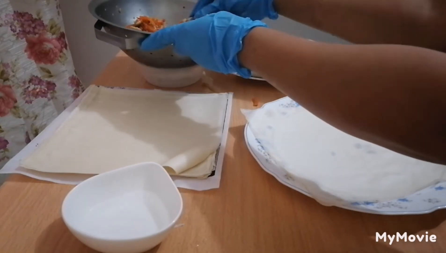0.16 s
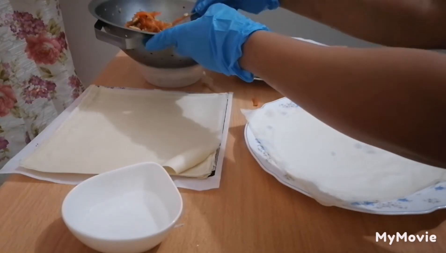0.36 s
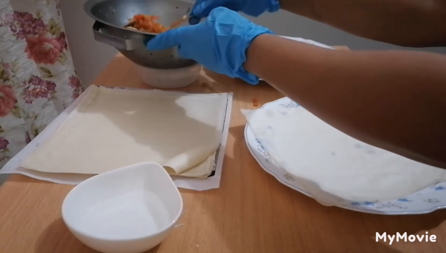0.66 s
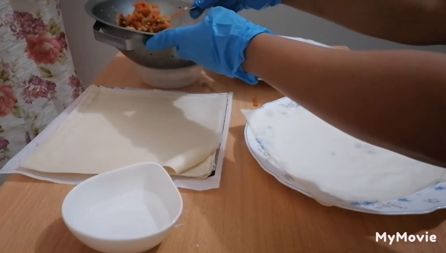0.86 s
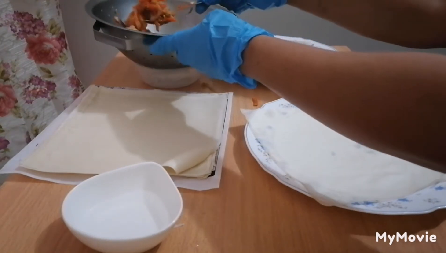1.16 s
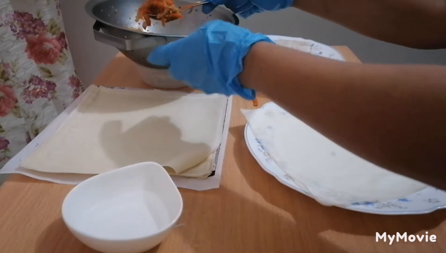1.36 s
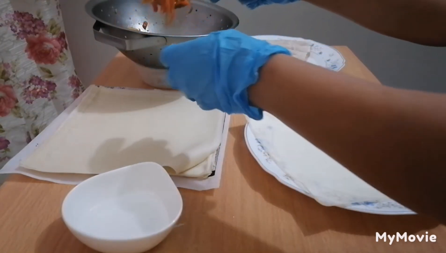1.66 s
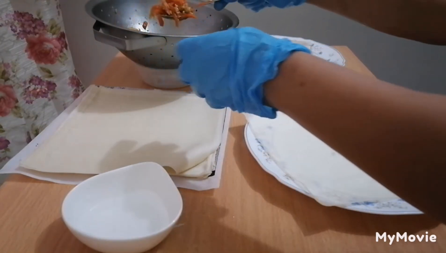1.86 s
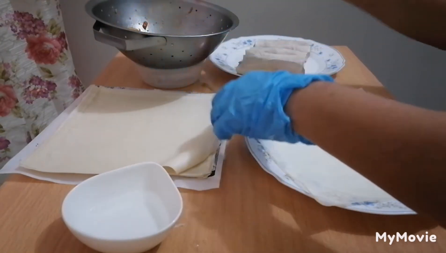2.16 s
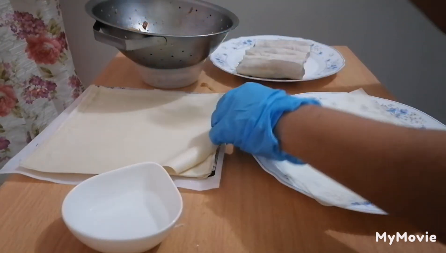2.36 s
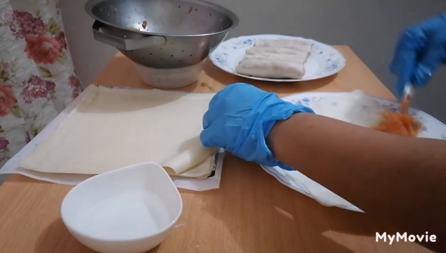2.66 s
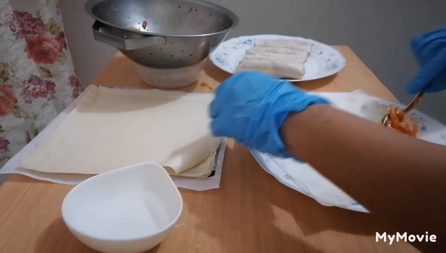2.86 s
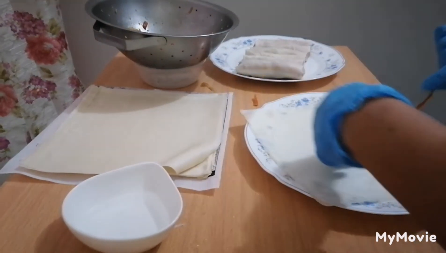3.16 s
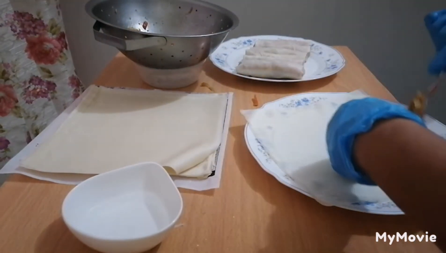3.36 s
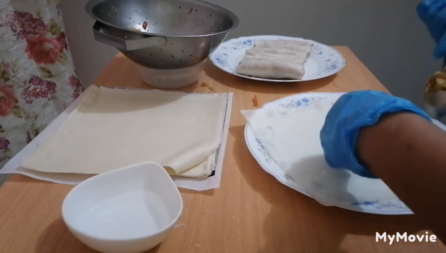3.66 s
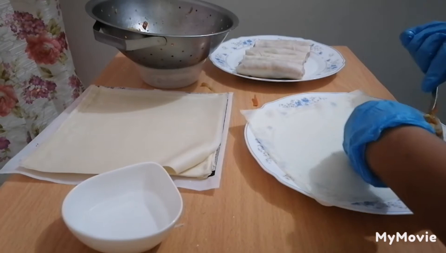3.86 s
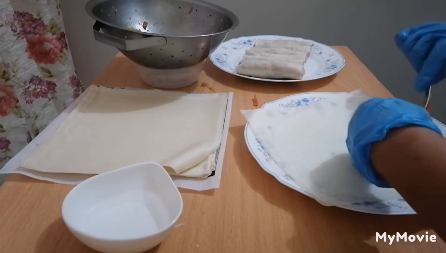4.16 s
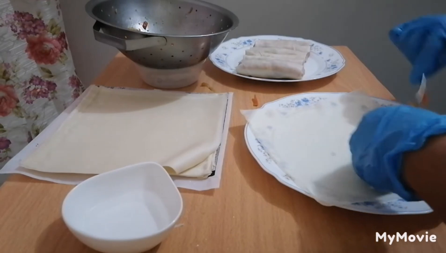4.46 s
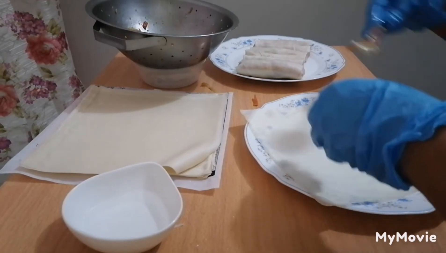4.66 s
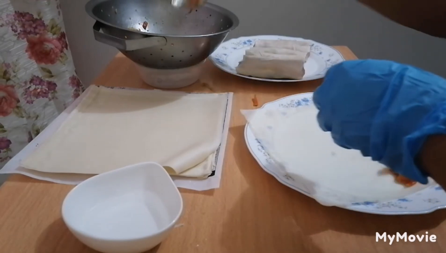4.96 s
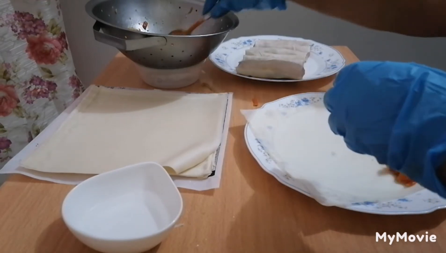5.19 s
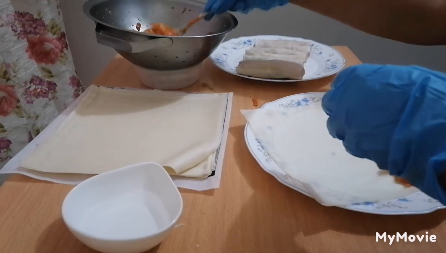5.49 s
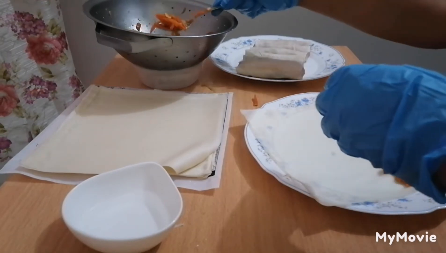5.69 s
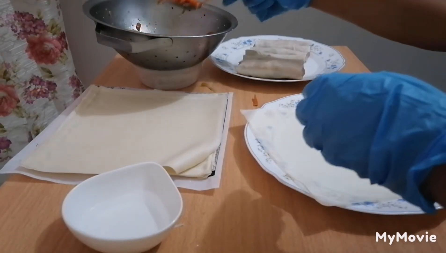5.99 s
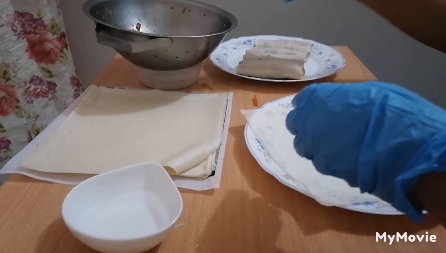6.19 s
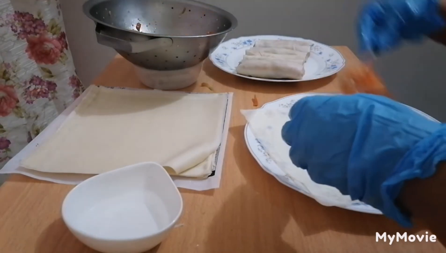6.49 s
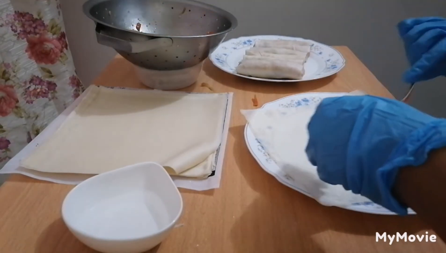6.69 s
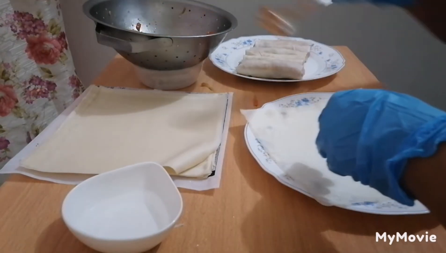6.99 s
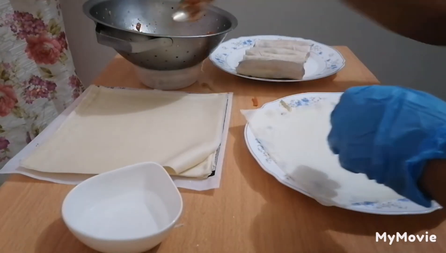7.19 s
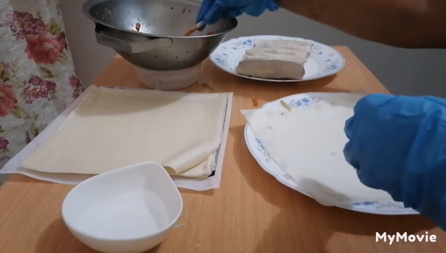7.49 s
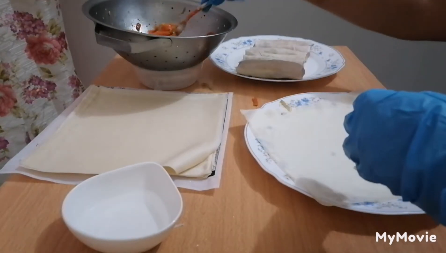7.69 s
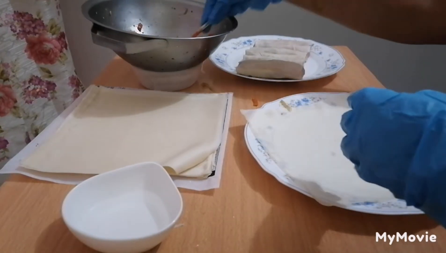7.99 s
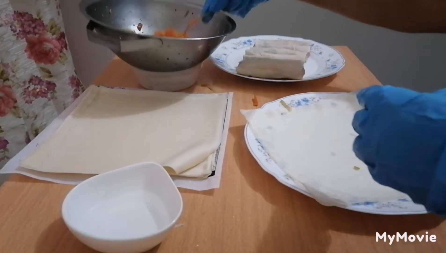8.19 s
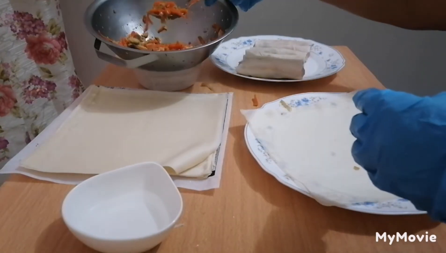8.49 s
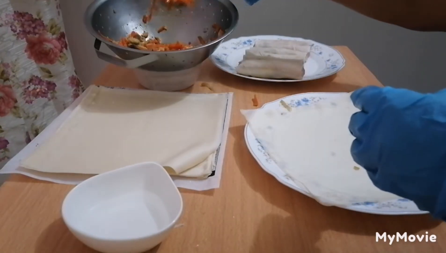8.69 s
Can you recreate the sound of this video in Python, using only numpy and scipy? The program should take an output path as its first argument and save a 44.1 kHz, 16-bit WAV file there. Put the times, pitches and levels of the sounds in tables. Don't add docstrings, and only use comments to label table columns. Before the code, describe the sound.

Close, slightly hissy stereo pickup at a kitchen table. Soft dry crinkling of gloves and pastry comes and goes over a constant low hum. A sudden metallic clink and gritty scrape rings the steel bowl, then near quiet with light brushes, a woody knock and a crisp high tick. Finally spoon scraping returns, with rapid hollow knocks as the bowl judders on the wood, dying back to hum.

```python
import sys
import numpy as np
from scipy import signal
from scipy.fft import rfft, irfft
from scipy.io import wavfile
from scipy.ndimage import uniform_filter1d

SR = 44100
rng = np.random.default_rng(int(sys.argv[2]) if len(sys.argv) > 2 else 0)


def wav_out(sig):
    wavfile.write(sys.argv[1], SR, np.round(np.clip(np.atleast_2d(sig).T, -1, 1) * 32767).astype(np.int16))


def makeup_ratio(level_db):
    decades = np.asarray(level_db, float) / 20
    return 10 ** decades


N = 389844

# mains_multiple, level_db, left_minus_right_db, left_lead_rad
HUM_LINES = [(1, -52, -3.5, -0.36), (2, -66, -3.5, -0.36), (3, -61, -4.5, 0.07), (4, -90.5, 0, -.3),
             (5, -85, -4, -1.5), (8, -89, 4, 8), (9, -84, 8, 1.7)]
# shaft_multiple, level_db, left_minus_right_db
ROTOR_LINES = [(0.915, -75, 0), (4.63, -88, 6), (6.94, -74, -2), (11.04, -69.5, 1), (13.04, -82, -5.5),
               (13.88, -69, -4), (14.92, -77, 0), (17.12, -73.5, -5), (23.3, -77, 5), (28.5, -108, 11),
               (34.6, -82.5, 4.5), (45.7, -79, -2.5)]
# centre_hz, width_hz, level_db, left_minus_right_db
ROOM_BOOMS = [(53.7, 3.1, -70.5, -5), (184.4, 8.4, -69.5, -3), (369.8, 8.2, -74.5, 0),
              (431.4, 3.3, -73.5, 0), (560, 2.7, -82, -11.5), (726.5, 29, -75.5, -6)]
# freq_hz, density_db_per_hz
AIR_SPECTRUM = [(15, -85), (80, -76.5), (140, -90.5), (240, -81.5), (350, -91), (600, -98), (1000, -102),
                (1500, -110), (2500, -113), (3400, -115), (4000, -124), (5200, -121), (8000, -132),
                (16000, -140)]

# peak_s, rise_s, fall_s, level_db, dullness_db
PASTRY_SLIDES = [(.46, 0.086, 0.038, -66, 1), (.65, 0.17, 0.1, -74.5, 7.5), (.8, 0.12, 0.11, -82.5, 10.5),
                 (1.15, 0.22, 0.082, -76.5, 3.5), (2.05, 0.11, 0.086, -66.5, 0),
                 (2.3, .06, 0.28, -75.5, 6.5), (2.445, 0.12, 0.22, -63.5, 2),
                 (2.503, 0.11, 0.042, -53.5, -6), (2.57, 0.06, 0.025, -67, 7),
                 (2.86, 0.079, 0.077, -64.5, -1), (2.96, 0.04, 0.29, -61.5, -5.5),
                 (3.04, 0.078, 0.11, -60, -8), (3.13, 0.094, 0.039, -66, 0),
                 (3.335, 0.059, 0.083, -65, 4.5), (3.445, 0.023, 0.13, -64, 4.5),
                 (3.49, 0.023, 0.12, -57, 1.5), (3.78, 0.088, 0.08, -67, -0.5),
                 (3.862, 0.033, 0.076, -51, 0), (3.93, .06, 0.066, -66.5, 4), (4.16, 0.073, 0.03, -70.5, 5),
                 (4.23, .1, 0.12, -72.5, -4), (4.65, 0.33, 0.43, -74, -4)]
# peak_s, rise_s, fall_s, level_db, dullness_db
GLOVE_BRUSHES = [(1.48, 0.27, .1, -70.5, 5), (1.82, 0.19, 0.14, -71, 1), (3.68, .03, .04, -73, -16),
                 (4.46, 0.074, 0.14, -60, 2), (4.98, 0.058, 0.062, -74, 0), (5.1, .2, 0.25, -73.5, -8),
                 (6.33, 0.11, 0.055, -75, -2), (6.49, 0.1, 0.055, -68, 4.5), (6.606, .02, 0.12, -68, -6),
                 (6.78, 0.18, .07, -72, -10), (7.44, .04, .15, -78, 11.5), (7.51, 0.076, 0.24, -69, -3),
                 (7.56, 0.16, 0.079, -81, 17), (7.746, 0.017, 0.086, -71, -14), (7.93, 0.17, .05, -79, -5),
                 (8.55, .03, 0.11, -74, -3)]
# peak_s, rise_s, fall_s, level_db, dullness_db
SKIN_CRINKLES = [
    (.64, 0.15, 0.053, -63, 2),
    (.78, 0.11, 0.1, -72.5, 0),
    (1.14, .15, 0.11, -80, 0),
    (2.065, .09, 0.059, -67.5, 0),
    (7.038, .03, 0.027, -76, 0),
    (7.5, 0.16, .3, -78, 0),
]
# low_hz, high_hz
RUSTLE_BANDS = [(4500, 8500), (8500, 13500), (2200, 4200), (900, 2000)]
# level_db, slope_db_per_dullness_db
PASTRY_BALANCE = [(-7, 0), (-6.5, -0.2), (-6.5, 1.3), (-26, 3.5)]
GLOVE_BALANCE = [(-9, -0.3), (-12.5, -0.24), (-7.5, 0.24), (-15.5, 1.6)]
SKIN_BALANCE = [(-13, 0), (-0.5, 0), (-41, 0), (-36, 0)]
IDLE_LEVELS = [-101, -93, -91, -89]
# middle_s, length_s, centre_hz, width_hz,
# level_db
HOLLOW_DRAGS = [(0.453, 0.097, 1200, 450, -68), (0.648, 0.2, 1980, 350, -68), (0.646, 0.14, 1300, 500, -64),
                (0.707, 0.78, 764, 119, -66.5), (.9, 0.22, 1690, 250, -74), (1.44, 0.057, 1190, 150, -71),
                (2.485, 0.34, 825, 250, -66.5), (2.57, 0.22, 1660, 200, -65.5),
                (3.067, 0.27, 1640, 202, -71), (3.861, 0.054, 108, 40, -38),
                (4.447, 0.064, 1235, 150, -61.5), (5.643, 0.078, 1480, 60, -68.5),
                (7.55, 0.094, 1870, 120, -78), (8.479, 0.02, 1200, 200, -55), (8.112, 0.057, 120, 50, -61),
                (1.47, .2, 5500, 1000, -81), (2.06, .12, 5300, 600, -76), (3.06, .2, 5700, 1400, -77),
                (3.5, .12, 5800, 1400, -74), (7.905, .12, 7300, 400, -84), (7.505, .06, 7700, 900, -76),
                (7.75, .03, 5860, 900, -73), (7.54, .15, 1200, 400, -67), (8.37, .1, 2300, 900, -62)]

# start_s, peak_db, lower_part_db, upper_part_db
TICK_EVENTS = [(2.4405, -58, -8, -10), (2.506, -43.5, 6, -4), (2.5, -52, 0, -4), (2.517, -54, 0, -6),
               (2.512, -53, 4, 3), (2.582, -48.5, -1, -6), (2.9464, -60, -8, -12), (3.035, -58, -5, -10),
               (3.052, -56, -5, -10), (3.4343, -65, 3, -10), (3.858, -50, 0, -6), (3.8464, -68, -9, -12),
               (4.033, -54, -5, -18), (4.1635, -49, -12, -7), (4.646, -54, -4, 0), (4.6974, -64, -5, 5),
               (5.188, -49, -14, -10), (5.264, -15, -11, -15.5), (5.2764, -23, -18, -5),
               (5.283, -30, -10, -10), (5.2994, -33, -10, -10), (5.3119, -36, -8, -10),
               (5.3415, -36, 0, -12), (5.355, -39, -8, -10), (5.373, -39, -8, -10), (5.388, -36, -5, -10),
               (5.395, -33, 2, -10), (5.411, -34, -2, -17), (5.4357, -44, -5, -14), (6.605, -56, -11, -11),
               (6.666, -43.5, -16, -22), (6.7264, -44, -5.5, -17), (6.829, -55, -12, -18),
               (7.0349, -58, -10, -7), (7.1072, -66, -10, -12), (7.121, -50, -2, -11),
               (7.2688, -24, -44, -18), (7.2805, -27, -40, -19), (7.741, -53, -8, -21),
               (7.757, -67, -25, -18), (7.7887, -58, -8, -18), (7.871, -51, -22, -20),
               (7.9544, -24.5, -14, 1.5), (7.958, -25, -6, -3), (7.9761, -20.5, -5.5, -11),
               (7.9843, -23, -6, -12), (7.991, -23, -8, -12), (8.006, -30, -8, -12), (8.0258, -31, -6, -12),
               (8.036, -36, -8, -12)]
# low_hz, high_hz
TICK_BANDS = [(5950, 9200), (2300, 5800), (9200, 17000)]
# start_s, peak_db, brightness_db
TABLE_KNOCKS = [(2.8675, -53.5, -24), (3.868, -58, -7), (5.264, -46.5, -1), (6.6668, -33.5, -5),
                (6.6699, -30, -35), (6.6715, -33, -33), (6.6748, -41, -30), (6.6805, -42, -27),
                (6.6935, -37.5, -20), (6.715, -48, -20), (6.735, -46.5, -25)]
# freq_hz, level_db, t60_s
TABLE_MODES = [(470, 9, 0.12), (366, -16, 0.07), (200, -9, 0.069), (660, -3, .045), (570, 1.5, 0.034),
               (710, 13, 0.021), (730, 3, 0.04), (864, 1.5, 0.059), (1008, 11, 0.024), (1200, 2.5, 0.045),
               (1490, -4, .03), (288, -2, 0.054), (1920, -3, 0.043), (2150, 1, .1), (3300, 14, 0.03),
               (3365, -3, .04)]
# start_s, peak_db, brightness_db
FOOT_SKIPS = [(7.977, -45, 16), (8.074, -29, -11), (8.082, -62, -5), (8.1085, -27.5, -23), (8.122, -38, -8),
              (8.13, -38, -11), (8.285, -35, -19), (8.315, -32, -11), (8.329, -43, -11),
              (8.3438, -22.5, -18), (8.3528, -31, -7), (8.3587, -44, -12), (8.3665, -31, -7),
              (8.3773, -31, -8), (8.3836, -28.5, -9), (8.3995, -27, -12), (8.403, -37, -10),
              (8.4114, -37, -14), (8.423, -44, -12), (8.46, -39, -21), (8.141, -38, -8), (8.149, -41, -10),
              (8.092, -40, -6), (8.48, -48, -18), (8.0765, -45, -11)]
# freq_hz, level_db, t60_s
FOOT_MODES = [(646, -14, 0.044), (788, -6, .035), (845, 3, 0.015), (1080, -14, 0.021), (1630, -1.5, 0.017),
              (2120, -3, 0.017)]

# start_s, rim_db, wall_db
SPOON_CLINKS = [(5.188, -49, -90.5), (5.264, -45.5, -60), (5.278, -52, -68), (5.341, -68, -55),
                (5.368, -62, -80), (5.395, -64, -61), (5.414, -82, -66), (7.956, -68, -49.5),
                (7.964, -72, -58), (7.972, -68, -51), (7.978, -61, -53), (7.989, -73, -55),
                (7.996, -74, -65)]
# freq_hz, level_db, t60_s
RIM_MODES = [(800, 9, 0.2), (880, 2.5, .1), (915, 0.5, 0.11), (985, -4, 0.14), (1060, -7, 0.085)]
WALL_MODES = [(2420, -9, .16), (2430, -15, .1), (3216, 5, 0.11), (3300, 11.5, 0.06), (3830, -18, .2),
              (5240, -28, .15), (6100, -16, 0.16)]
BOWL_MODES = [(1480, -7, 0.16), (1926, -4, 0.089), (2150, -26, 0.062), (2600, 1, 0.097), (2700, -4, 0.12),
              (3084, -3, .1), (3320, -4.5, 0.078), (2840, -5, 0.074), (3860, -5, .15), (4700, -15, 0.16),
              (5190, 0, 0.073), (6200, 4, 0.082), (6430, 0, .08), (7030, -1.5, 0.082), (8320, -5, .08)]
# peak_s, rise_s, fall_s, level_db, dullness_db
EDGE_RUNS = [(5.264, 0.0048, 0.04, -31, -1), (5.277, 0.008, 0.042, -32, -1), (5.31, 0.034, 0.11, -39, -4),
             (5.35, 0.043, 0.055, -31, -1.5), (5.375, .04, 0.045, -42, -3),
             (5.398, 0.043, 0.035, -33, -3.5), (5.45, .03, 0.078, -52, 1), (5.51, .04, 0.067, -65, 2),
             (7.954, 0.0036, 0.057, -34, -1), (7.964, 0.015, .04, -40, 0),
             (7.974, 0.014, 0.051, -27.5, 3.5), (7.99, 0.017, 0.048, -37, 0),
             (8.02, 0.027, 0.045, -39.5, 1), (8.04, 0.049, 0.2, -47.5, -5), (8.22, 0.097, .1, -84, -5),
             (8.33, 0.078, 0.1, -47.5, -8), (8.365, 0.033, .06, -46, -2), (8.4, 0.071, .03, -43, -2.5),
             (8.47, .03, 0.087, -64, 7)]
# peak_s, rise_s, fall_s, level_db, dullness_db
BOWL_PUSHES = [(5.27, 0.015, 0.036, -44, 1), (5.41, .06, 0.033, -64, -2), (5.48, 0.082, 0.069, -66.5, -12),
               (7.979, 0.021, 0.046, -63, 11), (8.077, 0.011, 0.032, -53, -12.5),
               (8.108, 0.053, 0.05, -56, -7), (8.29, 0.037, 0.091, -47.5, -5),
               (8.348, .012, 0.073, -44, -1), (8.398, 0.17, 0.039, -43, 4), (8.47, .04, 0.027, -58, -2)]
# low_hz, high_hz
SCRAPE_BANDS = [(4850, 16000), (2250, 3600), (1150, 2200), (520, 1150)]
# level_db, slope_db_per_dullness_db
EDGE_BALANCE = [(-8, -0.5), (-19.5, 1), (-34.5, -2), (-50, 4)]
WEIGHT_BALANCE = [(-43, -0.057), (-21.5, -0.88), (-7.5, -0.97), (-4, 0.33)]
# freq_hz, level_db, t60_s
PLATE_MODES = [(575, 17, 0.033), (4930, 1, .04), (6000, 4, 0.025), (6850, 2, 0.034), (8400, -2, 0.018)]
SPOON_MODES = [(7300, -2, .15), (6934, -3, .14), (7036, -4, .15), (7180, -3, .17), (7410, -2, .16),
               (7540, -4, .15), (8080, -6, .15), (8457, -6, .13), (10620, -6, .15), (11510, -9, .13)]

# freq_hz, left_db, right_db
HANDS_SHADING = [(1000, 1.5, 0.5), (2200, -2.5, -0.5), (3800, -1.5, 2.5), (4900, 0, 0.5), (5900, -3, 9),
                 (7600, -5, -2), (8300, 5, -2.5), (10100, 0, -2), (13500, -3, -2), (14800, 8, 6)]
BOWL_SHADING = [(400, 0.5, -1), (774, 4.5, -2), (1400, -1.5, 1), (2800, -0.5, -0.5), (3500, 2, 1.5),
                (4100, 3.5, 0.5), (4800, 2, 0.5), (5960, -4, 2), (8100, 6.5, -0.5), (9750, -1, 0),
                (13500, 0.5, -1), (14900, 0, 3)]
# freq_hz, gain_db
LEFT_CAVITY = [(100, -3.5), (1500, -1.5), (3000, 1.5), (4100, -7), (5200, -2), (5900, 2.5), (7200, -1.5),
               (8200, -7), (9500, 5), (10100, 10.5), (10700, 2.5), (11400, 1), (12400, -4), (16000, -17.5)]
RIGHT_CAVITY = [(100, 0), (1500, 0), (3000, 1), (4100, -2), (5200, 3), (5850, 0), (6550, 6), (7000, 11),
                (7320, 16.5), (7650, 12), (8000, 7), (9300, -4), (10700, -8), (16000, -13)]
# freq_hz, gain_db
OVERALL_TONE = [(100, -0.5), (3300, 1), (3700, -3), (4150, -2.5), (4700, 0.5), (8200, -3), (8800, -3),
                (9600, -2), (16000, -0.5)]


def noise(*shape):
    return rng.standard_normal(shape)


def convolve(x, response):
    return signal.fftconvolve(x, response, axes=-1)[..., :N]


def colour(points, size=4096):
    hz, db = np.transpose(points)
    grid_hz = np.maximum(np.arange(size // 2 + 1) * SR / size, 1)
    gain_db = np.interp(np.log(grid_hz), np.log(hz), db)
    cepstrum = irfft(np.log(makeup_ratio(gain_db)))
    cepstrum[1:size // 2] *= 2
    cepstrum[size // 2 + 1:] = 0
    return irfft(np.exp(rfft(cepstrum)))


def band(x, lo_hz, hi_hz, order=3):
    return signal.sosfilt(signal.butter(order, [lo_hz, hi_hz], "band", fs=SR, output="sos"), x)


def resonance(x, centre_hz, width_hz, order):
    return unit(band(x, centre_hz - width_hz / 2, centre_hz + width_hz / 2, order))


def unit(x):
    return x / np.std(x)


def walk(rate_hz):
    k = int(SR / rate_hz)
    return unit(uniform_filter1d(uniform_filter1d(noise(N), k), k))


def pan(x, left_minus_right_db):
    return x * makeup_ratio(np.array([[left_minus_right_db], [-left_minus_right_db]]) / 2)


def blows(seconds, db):
    x = np.zeros(N)
    x[(np.asarray(seconds) * SR).astype(int)] = makeup_ratio(db)
    return x


def soft(x, contact_s):
    push = np.hanning(int(contact_s * SR) + 3)
    return convolve(x, push / push.sum())


def ring(x, modes):
    out = np.zeros(N)
    for hz, db, t60_s in modes:
        pole = np.exp((2j * np.pi * hz - np.log(1000) / t60_s) / SR)
        out += makeup_ratio(db) * signal.lfilter([1], [1, -pole], x).imag
    return out


def grains(per_s, spread_db):
    slips = rng.random(N) < per_s / SR
    return slips * noise(N) * makeup_ratio(spread_db * rng.exponential(size=N))


def strokes(rows, balance):
    roundness = 1.05
    t = np.arange(N) / SR
    out = np.zeros((len(balance), N))
    band_db, slope = np.transpose(balance)
    for peak_s, rise_s, fall_s, level_db, dull_db in rows:
        near = slice(max(int((peak_s - 3 * rise_s) * SR), 0), int((peak_s + 3 * fall_s) * SR))
        away = np.maximum((peak_s - t[near]) / rise_s, (t[near] - peak_s) / fall_s)
        gain = makeup_ratio(level_db + band_db + slope * dull_db)
        out[:, near] += gain[:, None] * makeup_ratio(-20 * away ** roundness)
    return out


def rubbed(slips, gains, bands_hz):
    return sum(gain * unit(band(slips, *hz)) for gain, hz in zip(gains, bands_hz))


def fan_hum():
    mains_hz, shaft_hz = 100.0, 16.65
    t = np.arange(N) / SR
    sides = np.array([[.5], [-.5]])
    out = np.zeros((2, N))
    for k, db, lr_db, lead_rad in HUM_LINES:
        phase = 2 * np.pi * (k * mains_hz * t + rng.random()) + lead_rad * sides
        out += pan(np.sqrt(2) * makeup_ratio(db + 0.62 * walk(0.47)) * np.sin(phase), lr_db)
    turn = 2 * np.pi * np.cumsum(shaft_hz * (1 + 0.002148 * walk(0.95))) / SR
    for k, db, lr_db in ROTOR_LINES:
        line = np.sin(k * turn + 2 * np.pi * rng.random())
        out += pan(np.sqrt(2) * makeup_ratio(db + 0.31 * walk(1.8)) * line, lr_db)
    for hz, width_hz, db, lr_db in ROOM_BOOMS:
        feed = noise(N) + 1.2 * noise(2, N)
        out += pan(makeup_ratio(db) * resonance(feed, hz, width_hz, order=1), lr_db)
    draught = unit(band(noise(2, N), 7.2, 40, order=1))
    return out + makeup_ratio(-65.5) * draught


def fan_air():
    alike_hz, pan_db = 465, 1
    shared, own = noise(N), noise(2, N)
    low = signal.butter(1, alike_hz, fs=SR)
    air = own + signal.lfilter(*low, shared - 1.03 * own)
    return pan(convolve(air * np.sqrt(SR / 2), colour(AIR_SPECTRUM, size=16384)[None]), pan_db)


def rustle():
    slips = grains(9000, 2.35) * makeup_ratio(2.03 * walk(49))
    gains = strokes(PASTRY_SLIDES, PASTRY_BALANCE) + strokes(GLOVE_BRUSHES, GLOVE_BALANCE)
    gains += strokes(SKIN_CRINKLES, SKIN_BALANCE) + makeup_ratio(np.array(IDLE_LEVELS))[:, None]
    return rubbed(slips, gains, RUSTLE_BANDS)


def swishes():
    t = np.arange(N) / SR
    out = np.zeros(N)
    for middle_s, length_s, hz, width_hz, db in HOLLOW_DRAGS:
        swell = np.exp(-8 * ((t - middle_s) / length_s) ** 2)
        out += makeup_ratio(db) * swell * resonance(noise(N), hz, width_hz, order=2)
    return out


def ticks():
    start_s, db, low_db, high_db = np.transpose(TICK_EVENTS)
    crunch = np.exp(-np.arange(600) / SR / 0.0019) / 6.25
    levels_db = (db + 12.0, db + low_db + 19.0, db + high_db + 24.5)
    out = np.zeros(N)
    for level_db, hz in zip(levels_db, TICK_BANDS):
        out += band(convolve(blows(start_s, level_db), crunch) * noise(N), *hz, order=6)
    return out


def knocks(rows, modes, contact_s):
    start_s, db, bright_db = np.transpose(rows)
    push = soft(-blows(start_s, db - 10.0), contact_s)
    body = band(ring(push, modes), 200, 6000, order=2)
    click = band(blows(start_s, db + bright_db + 24.5), 2000, 3260, order=2)
    return body + click


def clinks():
    start_s, rim_db, wall_db = np.transpose(SPOON_CLINKS)
    rim = band(ring(blows(start_s, rim_db), RIM_MODES), 797, 1100, order=3)
    return rim, ring(blows(start_s, wall_db), WALL_MODES)


def scrape():
    singing_db = -1.0
    chatter = grains(4000, 3.2) * makeup_ratio(2.2 * walk(120))
    gains = strokes(EDGE_RUNS, EDGE_BALANCE) + strokes(BOWL_PUSHES, WEIGHT_BALANCE)
    steady = ring(unit(chatter), BOWL_MODES)
    singing = ring(gains[1] * unit(chatter), BOWL_MODES) / np.std(steady)
    return rubbed(chatter, gains, SCRAPE_BANDS), makeup_ratio(singing_db) * singing


def plate():
    return ring(blows([7.123], -70.5), PLATE_MODES)


def spoon():
    shake_db = 4
    return ring(blows([7.2695], -54), SPOON_MODES) * makeup_ratio(shake_db * walk(250))


def room(x, direct):
    treble_t60_s, bass_t60_s, split_hz, onset_s, level_db = 0.18, 0.19, 900, 0.00049, 0
    t = np.arange(int(.5 * SR)) / SR
    treble = signal.lfilter(*signal.butter(1, split_hz, "high", fs=SR), noise(2, len(t)))
    bass = signal.lfilter(*signal.butter(1, split_hz, fs=SR), noise(len(t)) + 0.25 * noise(2, len(t)))
    tail = treble * makeup_ratio(-60 * t / treble_t60_s) + 0.59 * bass * makeup_ratio(-60 * t / bass_t60_s)
    tail *= np.clip(t / onset_s, 0, 1)
    tail *= makeup_ratio(level_db) / np.sqrt(np.sum(tail ** 2, axis=1, keepdims=True))
    tail[0, 8] += direct
    tail[1, 0] += direct
    return convolve(x[None], tail)


def airborne(rubbing, taps):
    turns_per_s = 3.1
    touch = rubbing + taps
    direct = 0.46 * rubbing + 0.8 * taps
    turn = 2 * np.pi * turns_per_s * np.arange(N) / SR
    echoes = room(touch * np.cos(turn), 0) + room(touch * np.sin(turn), 0)
    return echoes + np.array([np.roll(direct, shift=8), direct])


def shaded(x, points):
    hz, left_db, right_db = np.transpose(points)
    return convolve(x, np.array([colour(list(zip(hz, db))) for db in (left_db, right_db)]))


def scene():
    bowl_from_s = 5.1
    hands = rustle() + swishes()
    taps = ticks()
    at_bowl = np.arange(N) > bowl_from_s * SR
    thuds = knocks(TABLE_KNOCKS, TABLE_MODES, 0.00072) + knocks(FOOT_SKIPS, FOOT_MODES, 0.00034)
    rim, wall = clinks()
    scraping, singing = scrape()
    steel = 0.23 * rim + wall + singing + spoon()
    solid = room(0.82 * thuds + 0.8 * steel, 0.51)
    solid += pan(0.46 * thuds, 3.5) + 0.51 * steel + 0.63 * rim
    near = shaded(airborne(hands, taps * ~at_bowl), HANDS_SHADING)
    far = shaded(airborne(scraping, taps * at_bowl) + solid, BOWL_SHADING)
    at_ports = near + far + room(plate(), 2.1) + fan_air()
    return fan_hum() + convolve(at_ports, np.array([colour(LEFT_CAVITY), colour(RIGHT_CAVITY)]))


def ducked(x):
    depth_db, from_db, release_s, below_hz = -3, -47, 0.049, 460
    keep = np.exp(-1 / (release_s * SR))
    power = signal.lfilter([1 - keep], [1, -keep], np.mean(x ** 2, axis=0))
    power = np.maximum(power - np.median(power), 0)
    gain = makeup_ratio(depth_db * power / (power + makeup_ratio(2 * from_db)))
    bass = signal.filtfilt(*signal.butter(2, below_hz, fs=SR), x)
    return x + (gain - 1) * bass


def low_pass(x):
    return signal.sosfilt(signal.butter(12, 16530, fs=SR, output="sos"), x)


def record(dry):
    hiss_db, top_hz, offset = -71.5, 15350, -.0003
    heard = ducked(convolve(dry + makeup_ratio(hiss_db) * noise(2, N), colour(OVERALL_TONE)[None]))
    top = signal.ellip(7, .5, 28, top_hz, fs=SR, output="sos")
    return low_pass(signal.sosfilt(top, heard) + offset)


dry = scene()
out = record(dry)
wav_out(out)
```